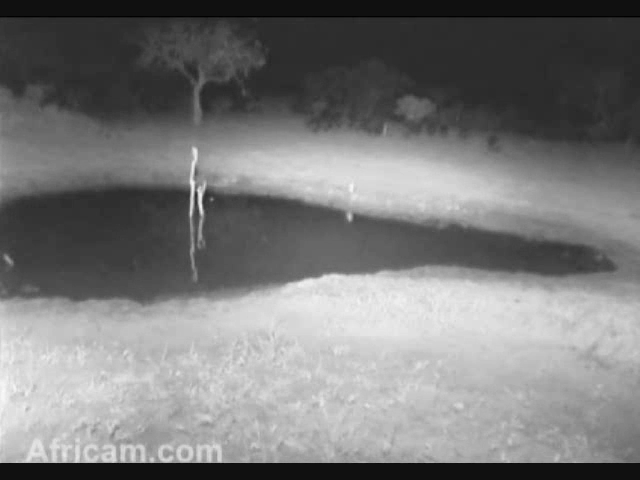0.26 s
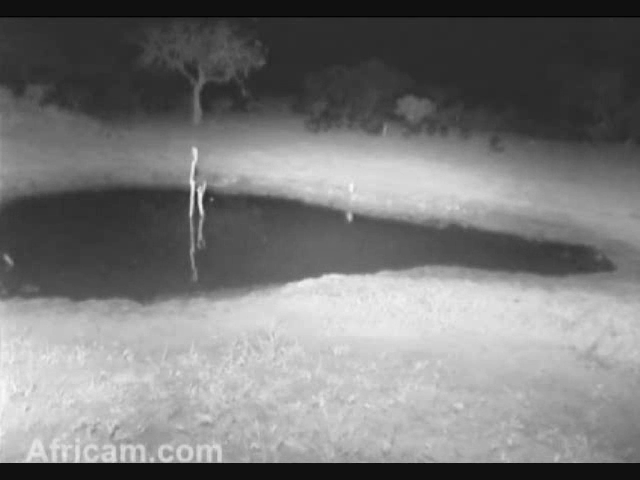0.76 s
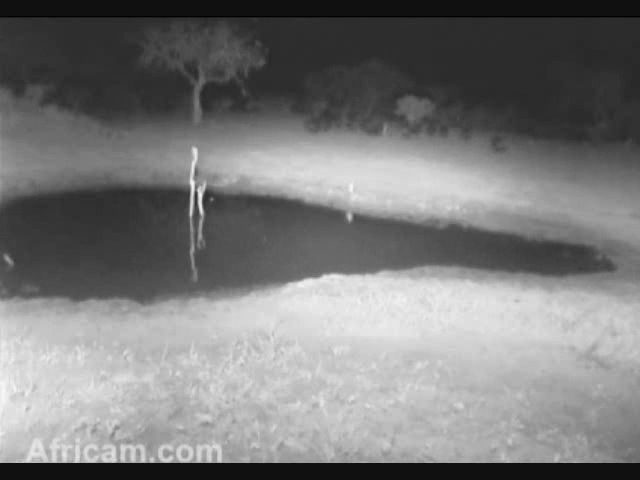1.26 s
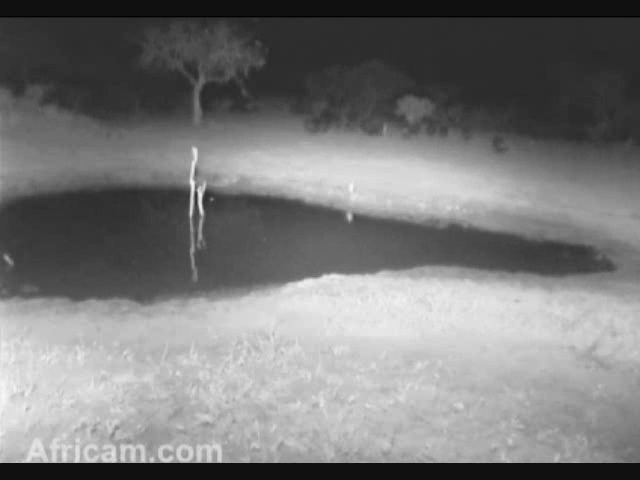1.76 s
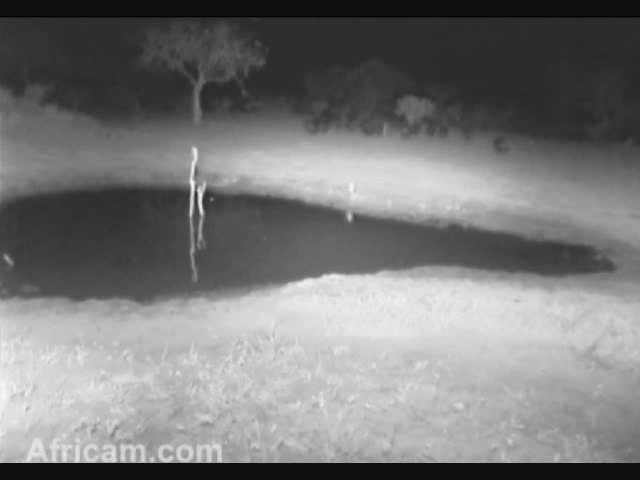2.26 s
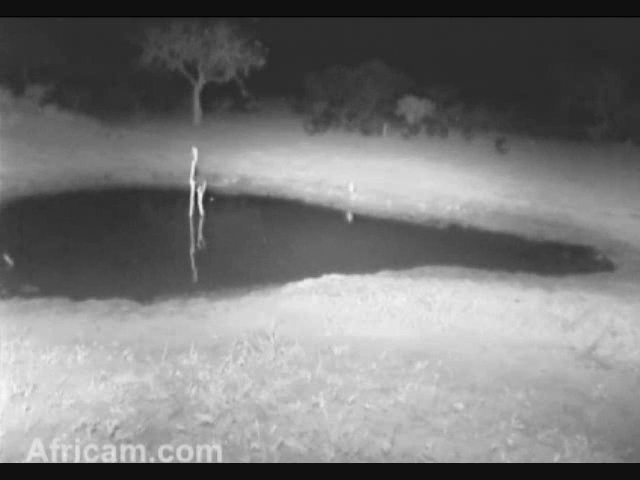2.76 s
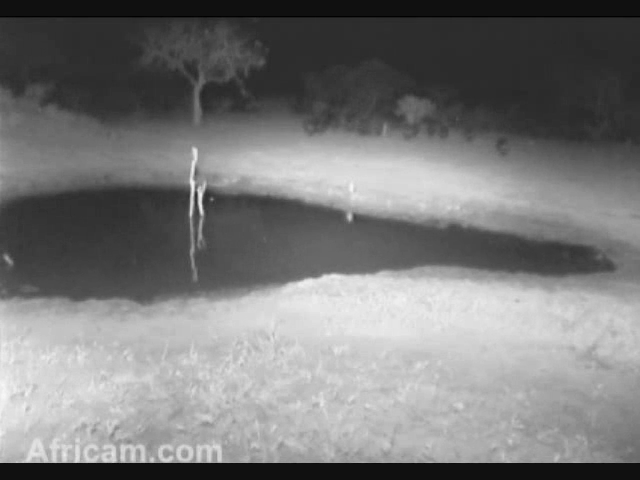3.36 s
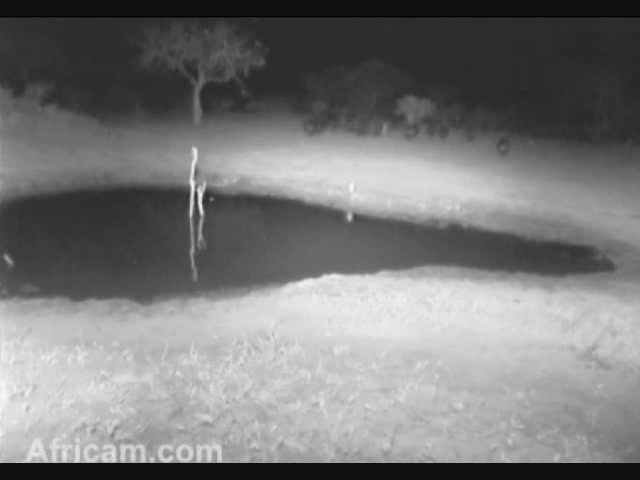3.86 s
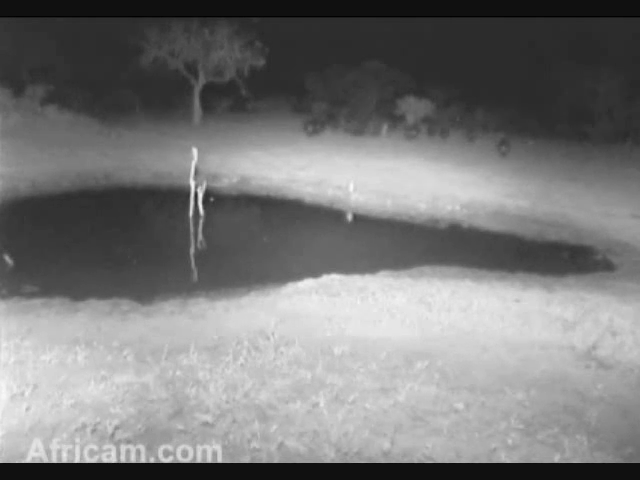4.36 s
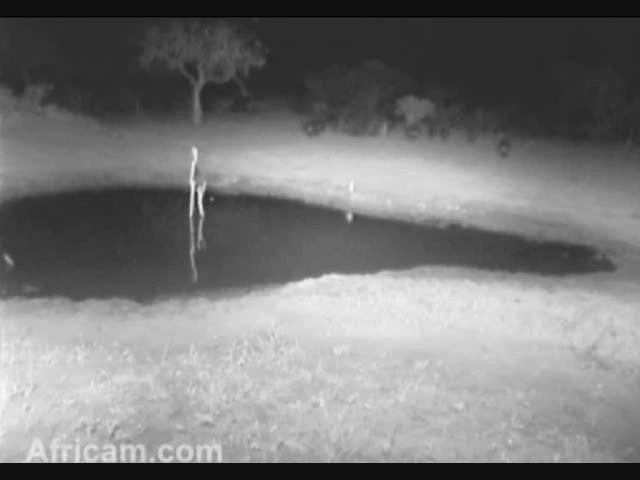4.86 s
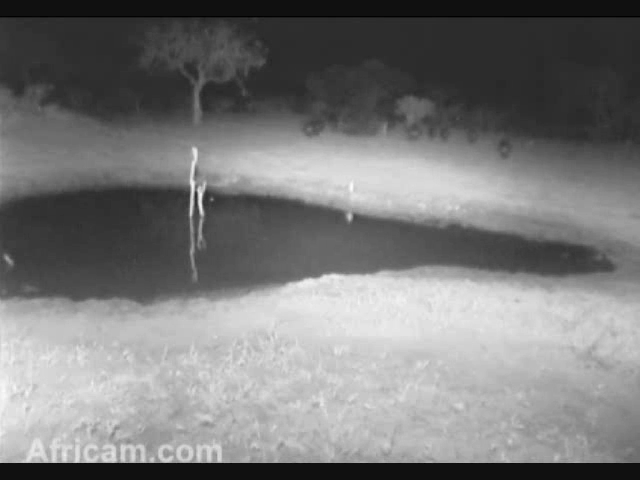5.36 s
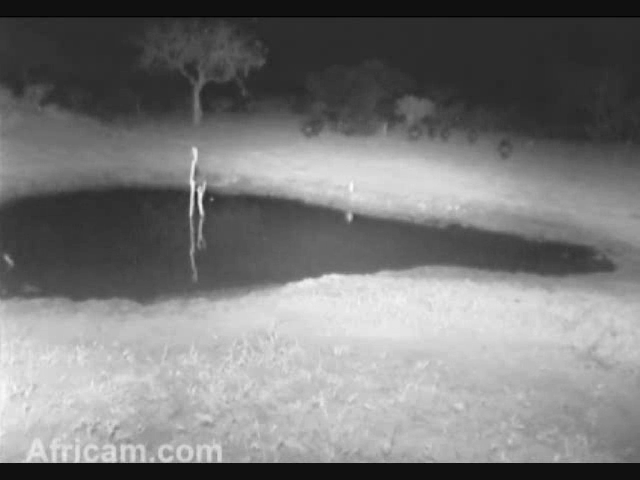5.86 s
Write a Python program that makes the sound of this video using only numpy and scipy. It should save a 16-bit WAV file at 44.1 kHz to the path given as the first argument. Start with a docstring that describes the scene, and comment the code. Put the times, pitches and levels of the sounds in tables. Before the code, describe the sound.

Unseen animals feed in the dark: hard clicks scatter through bush, grass rustles, a frog trills briefly three times, insects hiss faintly.

```python
"""Night at a waterhole

Unseen animals feed: short clicks make dry snaps, which the bush scatters, and soft footfalls.
Crackly shaped noise makes the rustling and brushing of grass. Frogs give three short trills, each
a pulsed pair of tones. Faint insects (noise) hiss over a rumble (noise) and a low mains hum (sines).
The background sinks once, briefly, and the microphone passes only a narrow band."""
import sys
import numpy as np
from scipy import signal
from scipy.fft import rfft, irfft, next_fast_len
from scipy.io import wavfile
from scipy.ndimage import uniform_filter1d, map_coordinates

SR = 44100
rng = np.random.default_rng(int(sys.argv[2]) if len(sys.argv) > 2 else 0)


def unload_wav(signal):
    """Save mono or channel-first audio to the path in sys.argv[1] as 16-bit WAV at rate SR, clipped to [-1, 1]."""
    wavfile.write(
        sys.argv[1],
        SR,
        np.round(np.clip(np.atleast_2d(signal).T, -1, 1) * 32767).astype(np.int16),
    )


N = 268957
TIME = np.arange(N) / SR  # seconds


def amp(db):
    """Turn dB into a gain."""
    return 10 ** (np.asarray(db) / 20)


def unit(x):
    """Scale a sound to an rms level of 1."""
    return x / np.sqrt(np.mean(x ** 2) + 1e-20)


def curves(rows):
    """One value per sample for each column after the time."""
    seconds, *columns = np.transpose(rows)
    return [np.interp(TIME, seconds, column) for column in columns]


def wobble(rate):
    """A smooth random curve through this many random points a second."""
    points = rng.standard_normal(int(N * rate / SR) + 4)
    return map_coordinates(points, [TIME * rate])


def filtered(x, response):
    """Change the strength of each frequency in x by a response."""
    size = next_fast_len(N + 8192)
    frequencies = np.fft.rfftfreq(size, 1 / SR)
    return irfft(rfft(x, size) * response(frequencies), size)[:N]


def coloured(x, spectrum):
    """Give x a tone colour from (Hz, dB) points, at an rms level of 1."""
    f, db = np.transpose(spectrum)
    return unit(filtered(x, lambda hz: amp(np.interp(np.log(hz + 1), np.log(f), db))))


def add(track, s, sound):
    """Mix a sound into the track from time s."""
    start = max(round(s * SR), 0)
    track[start:start + len(sound)] += sound[:max(N - start, 0)]


def patchy(depth_db):
    """White noise whose loudness varies in patches of time and frequency."""
    bins = signal.stft(rng.standard_normal(N), nperseg=512)[2]
    field = rng.standard_normal(bins.shape)
    field = uniform_filter1d(field, size=4, axis=0)  # smooth across frequency
    field = uniform_filter1d(field, size=10, axis=1)  # and over time
    return unit(signal.istft(bins * amp(depth_db * unit(field)), nperseg=512)[1][:N])


def crackle(rate, share):
    """Patchy noise with a share of its power in tiny random ticks, about rate of them a second."""
    ticks = (rng.random(N) < rate / SR) * rng.standard_normal(N)
    share = np.clip(share, 0, 1)
    return np.sqrt(share) * unit(ticks) + np.sqrt(1 - share) * patchy(depth_db=3.4)


def swells(rows):
    """One bell-shaped swell of height 1 for each (middle s, spread s, ..) row."""
    return np.array([np.exp(-.5 * ((TIME - s) / width) ** 2) for s, width, *_ in rows])


def scatter(sound, t60, rate, delay):
    """Many weak echoes from ground and bushes, as strong in sum as the sound itself."""
    t = np.arange(SR // 3) / SR
    paths = (rng.random(len(t)) < rate / SR) * rng.standard_normal(len(t))
    # the echoes build up over the delay and fall by 60 dB in t60 seconds
    paths = paths * amp(-60 * t / t60) * np.clip(t / delay, 0, 1) ** 2
    echoes = signal.fftconvolve(sound, paths)
    return echoes * np.linalg.norm(sound) / (np.linalg.norm(echoes) + 1e-12)


# hum, rumble and hiss sink once, briefly
LULL_FROM_S, LULL_TO_S, LULL_RAMP_S = 1.77, 2.143, 0.017
LULL_BASS_DB, LULL_HISS_DB = -27, -4


def lull():
    """1 while the background sinks, 0 elsewhere, with short ramps between."""
    return np.clip(np.minimum(TIME - LULL_FROM_S, LULL_TO_S - TIME) / LULL_RAMP_S, 0, 1)


INSECT_DB, INSECT_SWAY_DB, RUMBLE_DB = -47, 1, -63.5
HUM_WAVER_DB = 1  # slow unsteadiness of the hum
# Tones of the mains hum. Each row: frequency in Hz, rms level in dB before the waver and lull.
HUM_TONES = [(50, -74.5), (100, -57.5), (150, -67), (200, -59.5), (300, -67)]
# Tone colours of the insects and the rumble. Each row: frequency in Hz, relative level in dB.
INSECT_COLOUR = [(2200, -17.5), (3100, -4.5), (3750, 1.5), (4050, -1), (4300, -1.5), (4600, -5.5),
                 (4900, -6), (5200, -8), (6100, -9), (6650, -5), (7000, -12)]
RUMBLE_COLOUR = [(10, -2.5), (30, -0.5), (55, -7), (80, 3.5), (110, -11.5), (200, -46)]


def night():
    """Far insects, a faint rumble and a slightly wavering mains hum, steady but for one lull."""
    insect_db = INSECT_DB + INSECT_SWAY_DB * wobble(8) + LULL_HISS_DB * lull()
    insects = amp(insect_db) * coloured(patchy(depth_db=2.5), INSECT_COLOUR)
    rumble = amp(RUMBLE_DB) * coloured(rng.standard_normal(N), RUMBLE_COLOUR)
    hum = np.zeros(N)
    for hz, db in HUM_TONES:
        hum += np.sqrt(2) * amp(db) * np.sin(2 * np.pi * (hz * TIME + rng.random()))
    bass = rumble + hum * amp(HUM_WAVER_DB * wobble(5.7))
    return insects + bass * amp(LULL_BASS_DB * lull())


BODY_DB, CRISP_DB, LOW_DB = 2.5, -4, -6.5  # layer levels against the stirring
CRISP_FOLLOWS, LOW_FOLLOWS = 0.82, 0.41  # dB for each dB of stirring
SCUFF_LUMPS_DB, SCUFF_LUMPS_PER_S = 3, 40
# How busily the animals stir the grass. Each row: time in seconds, stirring level in dB.
STIRRING = [(0, -43.5), (.17, -47), (.27, -42.5), (.42, -42), (.7, -46.5), (.88, -47), (1.0, -41.5),
            (1.35, -46.5), (1.65, -49), (1.82, -44), (1.96, -50), (2.3, -47.5), (2.55, -47.5), (2.88, -44),
            (3.48, -47.5), (3.75, -45), (4.1, -47), (4.6, -52), (5.0, -47.5), (5.5, -48), (6.1, -45.5)]
# Feet dragging over the ground. Each row: middle in seconds, spread in seconds, level in dB.
SCUFF_STROKES = [(1.575, 0.017, -47), (1.731, 0.013, -46), (2.678, 0.013, -50.5), (2.775, 0.025, -48),
                 (2.918, 0.087, -44.5), (3.273, 0.083, -48.5), (4.22, 0.0088, -45.5), (4.855, 0.022, -52)]
# Tone colours of the dull, main and crisp layers. Each row: frequency in Hz, relative level in dB.
LOW_COLOUR = [(60, -24.5), (130, -4), (250, -2.5), (330, -1.5), (420, -2), (600, -3.5), (1000, -40.5)]
BODY_COLOUR = [(250, -35.5), (480, -8.5), (780, 3.5), (1100, 1.5), (1500, -1.5), (1900, -13.5),
               (3000, -43.5)]
CRISP_COLOUR = [(1000, -30.5), (1750, -2), (2350, -1.5), (2850, -9), (3500, -16.5), (5000, -18)]


def rustling():
    """Shuffling in dry grass and leaves: one effort drives a dull layer and two brighter crackly ones."""
    stir_db, = curves(STIRRING)
    usual_db = stir_db.mean()
    effort_db = stir_db - usual_db

    drags = amp(np.array(SCUFF_STROKES)[:, 2]) @ swells(SCUFF_STROKES)
    drags = drags * amp(SCUFF_LUMPS_DB * wobble(SCUFF_LUMPS_PER_S))
    ground = amp(usual_db + LOW_DB + LOW_FOLLOWS * effort_db) + drags
    low = ground * amp(0.46 * wobble(26)) * coloured(crackle(rate=150, share=0.28), LOW_COLOUR)

    body_db = stir_db + BODY_DB + 2.2 * wobble(30)
    body = amp(body_db) * coloured(crackle(rate=120, share=0.3), BODY_COLOUR)

    crisp_db = usual_db + CRISP_DB + CRISP_FOLLOWS * effort_db + 0.37 * wobble(30)
    crisp = amp(crisp_db) * coloured(crackle(rate=150, share=0.2), CRISP_COLOUR)
    return low + body + crisp


THROAT_RISE_S = .008


def throat():
    """The loudness of one throat pulse: it swells smoothly to 1 and dies away."""
    u = np.arange(SR // 25) / SR / THROAT_RISE_S
    return u ** 6 * np.exp(6 * (1 - u))


# a trill's first pulses come slowly, then settle at a steady rate
TRILL_PER_S, WARM_UP_LAG_PULSES, WARM_UP_PULSES = 39.26, 1.02, 1.6
# the call grows from, and tires towards, a level this much lower
TRILL_ATTACK_S, TRILL_RELEASE_S, TRILL_DEPTH_DB = .04, .15, 11
# a trill starts flat by this share of its pitch and slides up in this time
SCOOP, SCOOP_S = .075, .075
TRILL_SAG, TRILL_WAVER = .02, .011  # shares of the pitch
TRILL_UNEVEN_DB = .7
UPPER_RATIO, UPPER_CLIMB_PER_S = 1.1, .4  # the upper tone climbs through the call
POND_T60_S, POND_PATHS_PER_S, POND_DELAY_S = .19, 1500, .007
# Frog trills. Each row: first pulse in seconds, end of the pulses in seconds, level in dB,
# pitch in Hz, scatter in dB against the trill, upper tone in dB against the main one.
FROG_TRILLS = [(.045, .39, -30, 1080, -.5, -12), (2.009, 2.3, -20.3, 1072, -3, -14),
               (4.036, 4.36, -31, 1088, -.5, -7)]


def frogs():
    """A scooping tone and a fainter one above, beaten into quickening pulses; distance blurs them."""
    track, k, t = np.zeros(N), np.arange(20), TIME[:SR // 2]
    times = (k + WARM_UP_LAG_PULSES * (1 - np.exp(-k / WARM_UP_PULSES))) / TRILL_PER_S
    for start, end, db, hz, scatter_db, upper_db in FROG_TRILLS:
        length, beats = end - start, np.zeros(len(t))
        for s in times[times < length]:
            add(beats, s, amp(rng.normal(0, TRILL_UNEVEN_DB)) * throat())

        rising = np.clip(1 - (t - THROAT_RISE_S) / TRILL_ATTACK_S, 0, 1)
        tiring = np.clip(1 - (length - t) / TRILL_RELEASE_S, 0, 1) ** 1.5
        scoop = np.clip(1 - t / SCOOP_S, 0, 1)
        pitch = hz * (1 - SCOOP * scoop - TRILL_SAG * tiring + TRILL_WAVER * wobble(59.2)[:len(t)])
        upper = hz * (UPPER_RATIO + UPPER_CLIMB_PER_S * t + TRILL_WAVER * wobble(60)[:len(t)])
        low, high = np.sin(2 * np.pi * np.cumsum([pitch, upper], axis=1) / SR)

        loudness = amp(db - TRILL_DEPTH_DB * (rising + tiring)) * beats
        trill = loudness * (low + amp(upper_db) * high)
        blur = amp(scatter_db) * scatter(trill, POND_T60_S, POND_PATHS_PER_S, POND_DELAY_S)
        add(track, start - THROAT_RISE_S, trill)  # the first pulse peaks at the start time
        add(track, start - THROAT_RISE_S, blur)
    return track


# Brushing through dry grass. Each row: middle in seconds, spread in seconds,
# level of the grass in dB, level of the swish in dB.
BRUSH_STROKES = [(0.069, 0.023, -33.5, -38), (0.639, 0.038, -41, -44), (1.188, 0.032, -55, -43.5),
                 (1.292, 0.0076, -35, -43), (1.573, 0.0088, -32.5, -47), (1.578, 0.049, -41, -44),
                 (2.029, 0.017, -35.5, -57), (2.48, 0.029, -43.5, -64), (2.778, 0.05, -46, -51),
                 (3.197, 0.027, -48, -45), (3.497, 0.013, -35, -43), (3.693, 0.013, -39, -43.5),
                 (3.784, 0.011, -37, -40), (4.063, 0.034, -39, -55), (4.47, 0.037, -38.5, -50.5),
                 (4.715, 0.019, -39, -46), (4.86, 0.066, -42, -46.5), (5.117, 0.028, -44.5, -45),
                 (5.361, 0.027, -43.5, -46.5), (5.77, 0.039, -42.5, -44)]
# Tone colours of the grass and its swish. Each row: frequency in Hz, relative level in dB.
GRASS_COLOUR = [(120, -25), (330, -6), (1100, 5), (2100, -4), (3000, -15), (5000, -33)]
SWISH_COLOUR = [(1500, -41), (2400, -14.5), (3100, -0.5), (3700, 13), (4400, 6.5), (4900, 5.5), (5400, -14),
                (6200, -16.5), (6700, 7.5), (7000, -12.5)]


def brushing():
    """A body sweeps past the stalks: each stroke swells and fades, with a high swish on top."""
    grass, swish = amp(np.array(BRUSH_STROKES)[:, 2:]).T @ swells(BRUSH_STROKES)
    grass = grass * coloured(crackle(rate=800, share=0.22), GRASS_COLOUR)
    swish = swish * coloured(crackle(rate=600, share=0.59), SWISH_COLOUR)
    return grass + swish


def packet_time(hz, cycles):
    """Time for one packet from -2 to 2, in units of the given number of cycles; 0 is its peak."""
    return np.arange(int(4 * cycles / hz * SR)) / SR * hz / cycles - 2


def pulse(hz, cycles):
    """A short wave packet, about this many cycles wide, that peaks after twice as many."""
    u = packet_time(hz, cycles)
    return np.exp(-2 * u ** 2) * np.cos(2 * np.pi * (cycles * u + rng.random()))


def click(hz, cycles):
    """A hard click that fills a band about hz / cycles wide evenly, with steep edges."""
    u = packet_time(hz, cycles)
    envelope = np.sinc(u) * np.cos(np.pi * u / 4)
    return envelope * np.cos(2 * np.pi * (cycles * u + rng.random()))


SCATTER_PER_S, SCATTER_DELAY_S = 1500, 0.002
# a quick extra scatter right after each knock, short and dense
EARLY_DB, EARLY_T60_S = -8.5, 0.022


def knock(hz, cycles, scatter_db, t60, crack_hz, crack_db):
    """A click with a gritty edge, followed by its scatter; returns the sound and the time to its peak."""
    ring, crack, rise = click(hz, cycles), pulse(crack_hz, 1.1), 2 * cycles / hz
    sound = amp(scatter_db) * scatter(ring, t60, SCATTER_PER_S, SCATTER_DELAY_S)
    sound += amp(EARLY_DB) * scatter(ring, EARLY_T60_S, SCATTER_PER_S, SCATTER_DELAY_S)
    sound[:len(ring)] += ring
    crack_start = max(round((rise - 2 / crack_hz) * SR), 0)
    sound[crack_start:][:len(crack)] += amp(crack_db) * crack
    return sound, rise


def thin(x, edge_hz):
    """Small sticks radiate no bass."""
    return signal.sosfilt(signal.butter(6, edge_hz, "high", fs=SR, output="sos"), x)


TWIGS_PER_S, TWIG_DB, TWIG_SPREAD_DB = 6.5, 11.5, 2  # TWIG_DB is against the stirring level
TWIG_HZ, TWIG_SPREAD_OCTAVES, TWIG_CYCLES, TWIG_SCATTER_DB = 1200, 0.27, 0.8, -3


def twigs():
    """Faint snaps at random moments, stronger when the stirring is busy; rows as in SHARP_KNOCKS."""
    count = 70
    gaps = rng.exponential(1 / TWIGS_PER_S, count)
    size, pitch = rng.standard_normal((count, 2)).T
    times = np.cumsum(gaps)
    db = np.interp(times, *np.transpose(STIRRING)) + TWIG_DB + TWIG_SPREAD_DB * size
    hz = TWIG_HZ * 2 ** (TWIG_SPREAD_OCTAVES * pitch)
    return [(*row, TWIG_CYCLES, TWIG_SCATTER_DB) for row in zip(times, db, hz)]


SNAP_T60_S, SNAP_CRACK_HZ, SNAP_CRACK_DB, STICK_EDGE_HZ = 0.3, 4200, -22, 441
# Sharp knocks: mostly snapping sticks, their high ticks and echoes, and the click of one footfall.
# Each row: peak time in seconds, level in dB, pitch in Hz,
# cycles of ring (at least 0.5 is played), scatter in dB against the ring.
SHARP_KNOCKS = [(0.1997, -5.5, 1210, 0.56, -4.5), (.2004, -33, 5850, 4.9, -16),
                (0.2015, -21, 3800, 3.5, -6), (.2018, -14.5, 570, 2.2, -10), (.2022, -5, 923, 1.03, -14.5),
                (.208, -26.5, 4150, 4.3, -10), (0.2106, -20, 3740, 1.6, -11.5),
                (.218, -17.5, 700, 1.7, -14), (.2256, -21, 850, 1.5, -16), (0.2712, -18.5, 850, .8, 4),
                (.317, -33, 6700, 3, -8.5), (.349, -18.5, 1320, 0.97, -3), (0.3908, -25, 1080, 0.65, 2),
                (0.5479, -7.5, 2210, 1.3, -17), (0.5499, -6.5, 1060, 0.97, -9.5),
                (0.549, -21.5, 2800, 1.7, -6), (.548, -25.5, 5900, 1.9, 0.5),
                (0.9018, -21.5, 1240, 0.84, -2), (0.932, -29, 1380, 1.2, 3), (0.978, -20.5, 1070, 1.25, -1),
                (1.0053, -28, 1000, 1.3, -5), (1.018, -15, 1360, 1.23, -9), (1.0981, -21, 1870, 1.76, -3.5),
                (1.293, -23.5, 1350, 0.46, 2), (1.722, -20, 1490, 0.77, 4), (1.753, -14.5, 990, 0.83, -9),
                (1.7627, -17.5, 900, 1, -4), (1.7872, -25, 1070, .9, -1), (2.317, -16, 1720, 0.49, -0.5),
                (2.3201, -19, 1410, 2.7, -7), (2.3436, -27, 1600, 1, -10), (2.5229, -20.5, 1030, 1.17, 2.5),
                (2.5304, -11.5, 1700, 0.91, -8.5), (2.5415, -22.5, 2080, 1.3, -7),
                (2.6321, -19, 1510, 0.57, -1), (2.7957, -28, 1900, 1.8, 2), (2.8672, -26.5, 1000, 2, -13),
                (2.882, -29, 6200, 2.1, 4), (2.9606, -20, 1240, 1.07, 3.5), (3.0402, -19, 1150, 1, -8),
                (3.0448, -17.5, 1020, 1.43, -6), (3.075, -22, 1050, 0.99, -19),
                (3.2301, -20, 1630, 0.95, -5), (3.2323, -17, 1340, 1.56, -6), (3.548, -24.5, 800, 2.3, 1),
                (3.555, -24, 900, 0.7, -8), (3.611, -20.5, 1040, 0.76, 4), (3.6154, -15.5, 1220, 0.95, -15),
                (3.768, -12, 1950, 1.58, -5), (4.237, -23.5, 1190, 2.2, -4), (4.787, -10.5, 2070, 1.7, -10),
                (4.7872, -30, 3470, 5.6, -3), (4.9329, -21.5, 1460, 1.1, 0.5),
                (5.0212, -19, 1840, 1.47, -2), (5.084, -27, 1900, 1.6, 3), (5.1247, -25.5, 3300, 1.3, -10),
                (5.178, -36.5, 6800, 6.4, -3), (5.33, -26.5, 2330, 2.2, -3), (5.3436, -31, 2200, 2.2, -5),
                (5.3911, -22, 2050, 0.8, -1.5), (5.3963, -27, 1630, 1.4, 6), (5.413, -10, 1130, 0.98, -8.5),
                (5.422, -15, 1200, 1.2, -16), (5.4498, -30, 6100, 3.1, -7.5), (5.539, -29, 4000, 5, 1),
                (5.5478, -33, 4200, 3, -8), (5.548, -30, 6800, 7.1, -8), (5.6378, -14, 810, 1.45, -7),
                (5.6503, -21, 750, 1.5, -10), (5.699, -27.5, 1400, 0.58, 9), (5.733, -24, 1890, 0.59, 3.5),
                (5.7493, -15, 1420, 0.86, -9), (5.762, -21.5, 1070, 2.7, -7),
                (5.807, -30.5, 4000, 2.6, 4.5), (5.8113, -23, 1410, 2.1, -10)]
# Two distinct echoes added to every row; some rows in the table above are stronger echoes themselves.
# Each row: lag in seconds, level in dB against the knock.
ADDED_ECHOES = [(.0124, -10), (.0268, -17)]


def snaps(rows):
    """Each row is one short ring with scatter and two echoes; a strong snap may take several rows."""
    track = np.zeros(N)
    for s, db, hz, cycles, scatter_db in rows:
        sound, rise = knock(hz, max(cycles, .5), scatter_db, SNAP_T60_S, SNAP_CRACK_HZ, SNAP_CRACK_DB)
        add(track, s - rise, amp(db) * sound)
        for lag_s, echo_db in ADDED_ECHOES:
            add(track, s - rise + lag_s, amp(db + echo_db) * sound)
    return thin(track, edge_hz=STICK_EDGE_HZ)


# every footfall: its ring, the decay of its scatter and its gritty edge
STEP_CYCLES, STEP_T60_S, STEP_CRACK_HZ, STEP_CRACK_DB = 1.05, 0.3, 1190, -5.5
THUMP_HZ, THUMP_CYCLES, THUMP_LAG_S = 83.6, 1.75, 0.0213  # the ground gives under a heavy step
# Soft footfalls, and an echo of the heaviest one. Each row: peak time in seconds, level in dB,
# pitch in Hz, scatter in dB against the ring, ground thump in dB against the row's level.
STEPS = [(.79, -41, 152, 4.5, -26), (3.608, -26, 362, -2.5, -24), (5.2679, -25.5, 340, -7, -14),
         (5.279, -29.5, 310, -3, -25), (5.64, -20.5, 430, -6, -16), (5.6505, -23.5, 470, -9, -30)]


def footfalls():
    """A dull knock of the foot, then a deep thump of the ground."""
    track = np.zeros(N)
    for s, db, hz, scatter_db, thump_db in STEPS:
        sound, rise = knock(hz, STEP_CYCLES, scatter_db, STEP_T60_S, STEP_CRACK_HZ, STEP_CRACK_DB)
        add(track, s - rise, amp(db) * sound)
        thump = amp(db + thump_db) * pulse(THUMP_HZ, THUMP_CYCLES)
        add(track, s + THUMP_LAG_S - 2 * THUMP_CYCLES / THUMP_HZ, thump)
    return track


def scene():
    """Feeding animals, frogs and the night, at one microphone."""
    background = night() + rustling()
    animals = frogs() + brushing() + snaps(SHARP_KNOCKS) + snaps(twigs()) + footfalls()
    return (background + animals)[None]


TOP_HZ = 7090  # middle of the microphone's 200 Hz wide upper edge


def record(dry):
    """The microphone feed keeps nothing above its band limit."""
    return filtered(dry[0], lambda hz: np.clip((TOP_HZ - hz) / 200 + .5, 0, 1))[None]


dry = scene()
out = record(dry)
unload_wav(out)
```